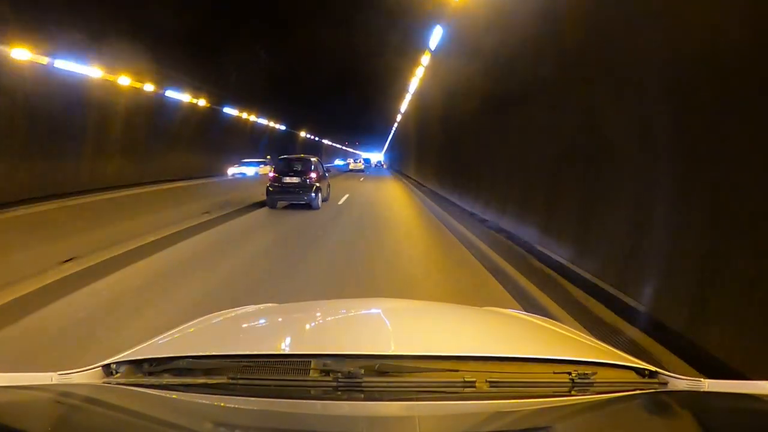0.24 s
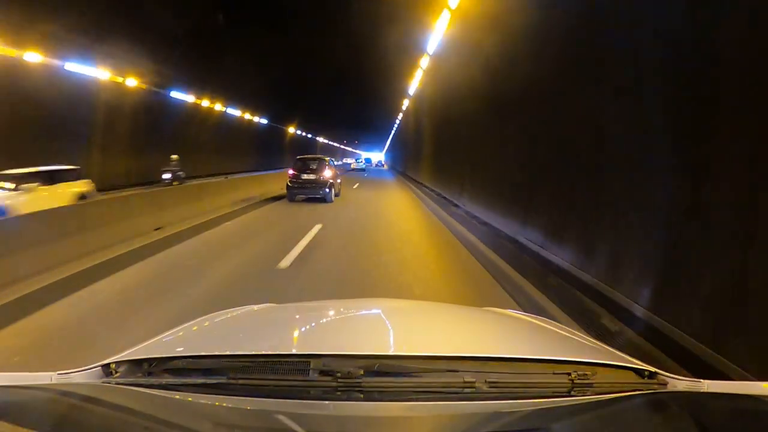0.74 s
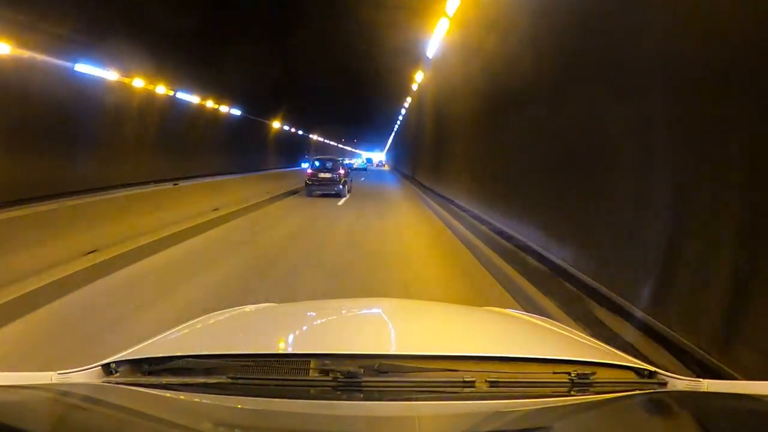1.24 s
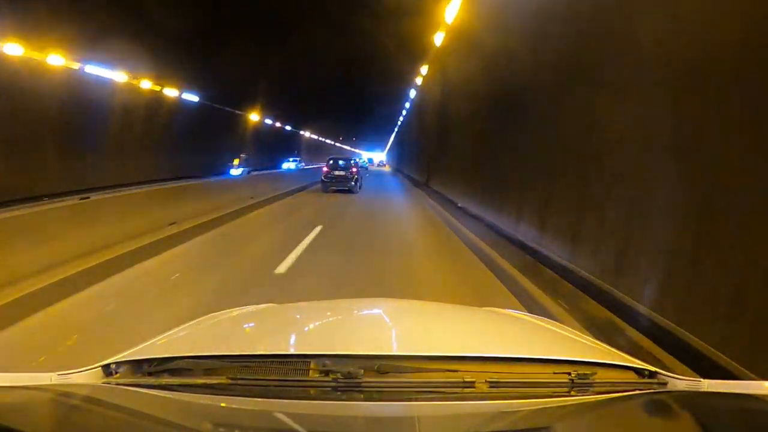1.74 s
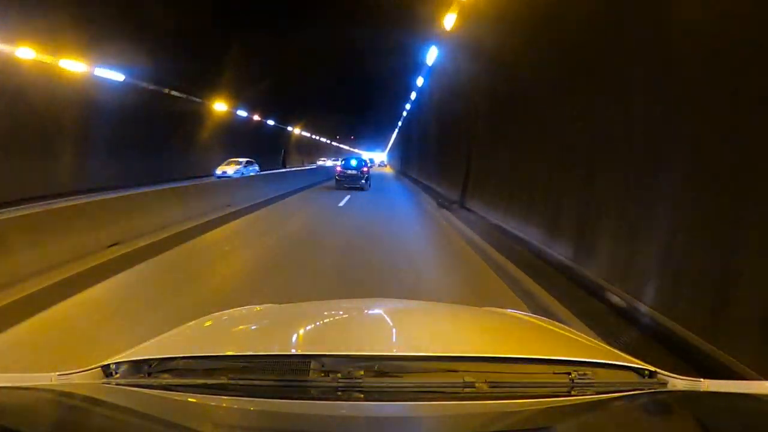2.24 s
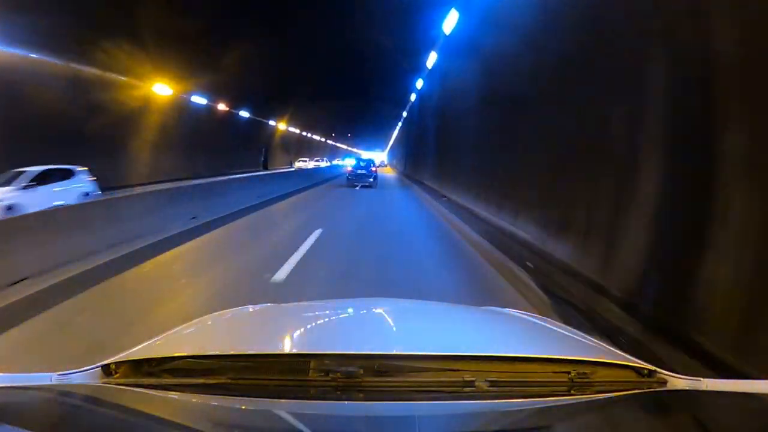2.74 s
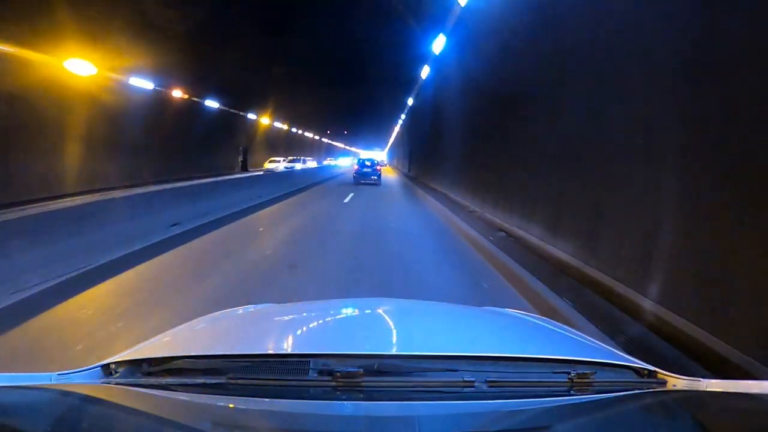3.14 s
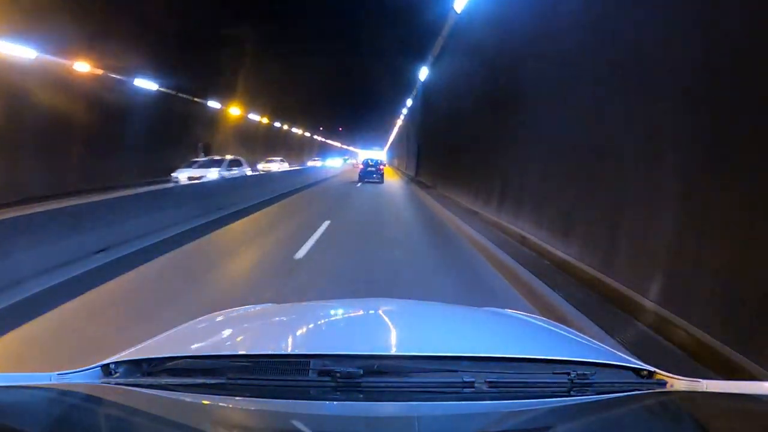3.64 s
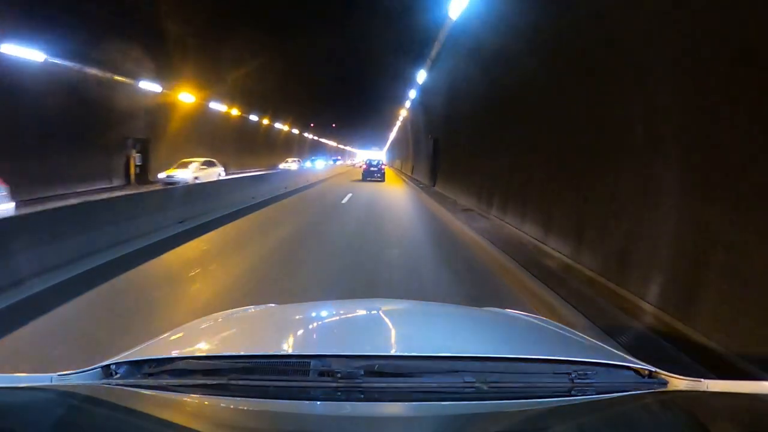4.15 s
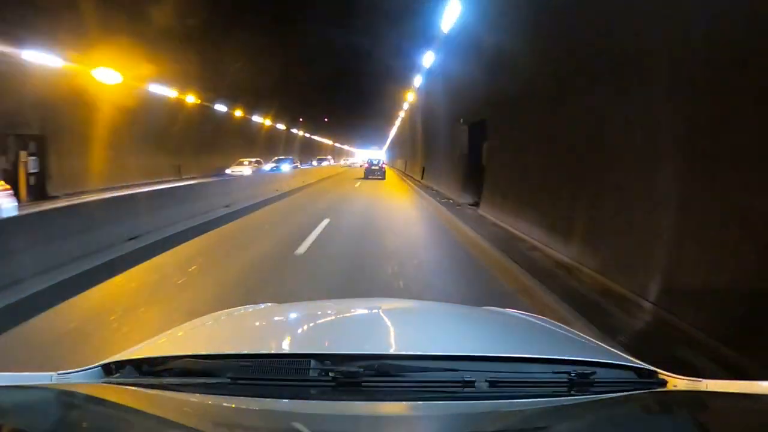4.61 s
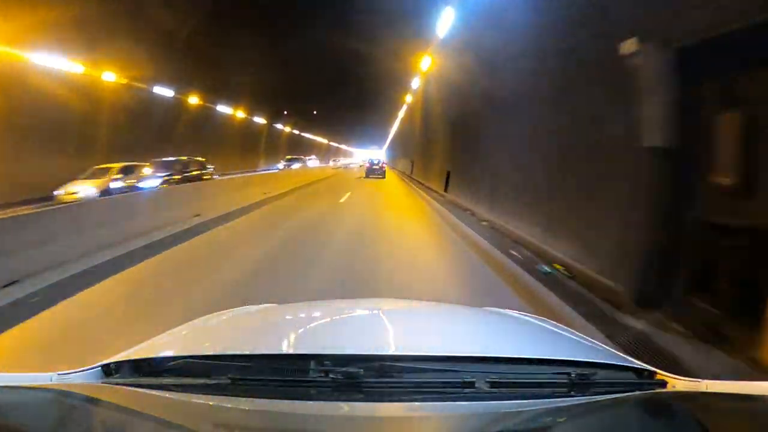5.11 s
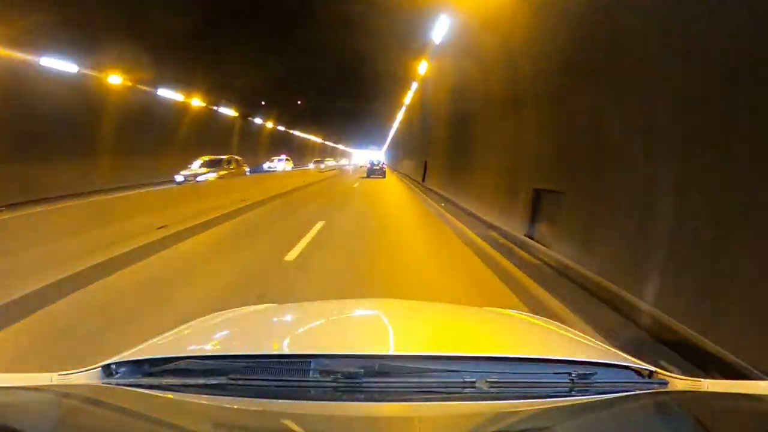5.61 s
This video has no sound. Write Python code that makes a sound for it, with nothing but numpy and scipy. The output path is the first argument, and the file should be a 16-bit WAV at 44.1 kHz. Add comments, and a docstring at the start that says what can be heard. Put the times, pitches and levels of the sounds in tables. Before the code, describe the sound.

From just behind the bonnet of a moving car, a deep, booming rumble dominates, surging irregularly with each bump in the road. Around it, continuous tyre noise washes through a concrete tunnel, rising and falling slightly as oncoming cars go by. Low wind buffets come harder in the second half, while light air hiss and occasional very faint trim rattles sit on top.

```python
"""Deep body rumble of a car cruising through a long road tunnel, heard from just behind the bonnet.
The uneven road shakes the panels; eddies off the bonnet buffet them. Tyre roar rings in the bore
and swells as oncoming cars pass behind the barrier. Air hisses over the windscreen and loose trim
chatters faintly."""
import sys
import numpy as np
from scipy import signal
from scipy.fft import rfft, irfft, next_fast_len
from scipy.io import wavfile
from scipy.ndimage import uniform_filter1d, minimum_filter1d, map_coordinates

SR = 44100
rng = np.random.default_rng(int(sys.argv[2]) if len(sys.argv) > 2 else 0)


def master_out(mix):
    """Clip the mix to full scale and print it as 16-bit PCM to the path in sys.argv[1]."""
    frames = np.transpose(np.atleast_2d(mix))
    ceiling = np.clip(frames, -1, 1)
    pcm = np.round(ceiling * 32767).astype(np.int16)
    wavfile.write(sys.argv[1], SR, pcm)


N = 258867
TIME_S = np.arange(N) / SR


def amp(db):
    """Decibels to gain."""
    return 10 ** (np.asarray(db) / 20)


def unit_rms(x):
    """x at rms 1."""
    return x / np.sqrt(np.mean(x ** 2) + 1e-20)


def over_freq(rows, hz):
    """(f/Hz, value) rows interpolated on a log axis."""
    knots_hz, values = np.transpose(rows)
    return np.interp(np.log(hz + 1), np.log(knots_hz + 1), values)


def over_time(rows):
    """(t/s, value) rows interpolated per sample."""
    return np.interp(TIME_S, *np.transpose(rows))


def wobble(rate_hz):
    """Smooth random curve, rate_hz knots a second."""
    knots = rng.standard_normal(int(N * rate_hz / SR) + 4)
    return map_coordinates(knots, [TIME_S * rate_hz])


def filtered(x, response):
    """Zero-phase filter with gain response(hz)."""
    size = next_fast_len(N + SR // 2)
    return irfft(rfft(x, size) * response(np.fft.rfftfreq(size, 1 / SR)), size)[:N]


def resonant(x, peaks):
    """Bell filters from (f/Hz, width/Hz, gain/dB) rows."""
    def response(hz):
        return amp(sum(db / (1 + (2 * (hz - peak_hz) / width_hz) ** 2) for peak_hz, width_hz, db in peaks))
    return filtered(x, response)


def noise(spectrum, patchy_db):
    """Coloured noise, rms 1, with drifting patches of random gain."""
    bins = signal.stft(rng.standard_normal(N), nperseg=1024)[2]
    patches = uniform_filter1d(rng.standard_normal(bins.shape), size=8, axis=0)
    patches = uniform_filter1d(patches, size=12, axis=1)
    patched = signal.istft(bins * amp(patchy_db * unit_rms(patches)), nperseg=1024)[1][:N]
    return unit_rms(filtered(patched, lambda hz: amp(over_freq(spectrum, hz))))


def steady(x, span_s):
    """Power held at 1 over span_s; faster flutter stays."""
    window = np.hanning(int(span_s * SR))
    energy = np.abs(signal.fftconvolve(x ** 2, window, 'same'))
    weight = signal.fftconvolve(np.ones(N), window, 'same')
    return x / np.sqrt(energy / weight + 1e-12)


# trim bursts: t/s, half-width/s, level/dB
TRIM_BURSTS = [(.24, .008, -75), (.61, .01, -78), (2.885, .008, -73.5), (3.425, .008, -76),
               (3.92, .008, -79), (4.39, .03, -73), (4.688, .03, -72), (4.895, .008, -76),
               (5.73, .025, -73)]
# trim buzz: f/Hz, density/dB
TRIM_SPECTRUM = [(2000, -29), (6000, -0.5), (10000, -3), (15000, -13.5)]
def trim_rattle(chatter_db):
    """Loose trim, shaken by the road, chatters in brief uneven contacts."""
    bursts = sum(amp(db) * np.exp(-((TIME_S - at_s) / half_s) ** 2) for at_s, half_s, db in TRIM_BURSTS)
    contacts = unit_rms(amp(chatter_db * wobble(rate_hz=250)))
    return bursts * contacts * noise(TRIM_SPECTRUM, patchy_db=-1.5)


# air over the glass: f/Hz, density/dB
HISS_SPECTRUM = [(400, -11.5), (1500, 3.5), (2400, 3.5), (3400, 0), (4300, -5), (5200, -10), (6300, -15),
                 (8000, -25), (10000, -37), (12500, -49), (15500, -61.5)]
# hiss envelope: t/s, level/dB
HISS_LEVEL = [(0.1, -46), (0.87, -45.3), (1.15, -46.8), (1.5, -45.5), (2.0, -44), (2.78, -43), (3.2, -45.5),
              (3.7, -46), (4.1, -45.8), (4.8, -48.5), (5.18, -50), (5.5, -49), (5.8, -48)]
# top treble of the hiss: t/s, gain/dB
FIZZ_GAIN = [(0.6, -2.5), (1.35, 4.5), (2.8, -1.5), (3.3, -5), (4.3, -3), (5.5, -0.5)]
def windscreen_hiss(gain_db, fizz_hz):
    """Small eddies hiss on the glass; the top treble comes and goes on its own."""
    hiss = noise(HISS_SPECTRUM, patchy_db=0.4)
    fizz = filtered(hiss, lambda hz: hz ** 4 / (hz ** 4 + fizz_hz ** 4))
    shelved = hiss + (amp(over_time(FIZZ_GAIN)) - 1) * fizz
    return amp(over_time(HISS_LEVEL) + gain_db) * shelved


# concrete bore decay: f/Hz, T60/s
BORE_T60 = [(100, 3.5), (1000, 2.1), (4000, 0.99), (12000, 0.93)]
def tunnel_wash(x):
    """The bore prolongs the sound; treble dies first."""
    hz, t_s, bins = signal.stft(rng.standard_normal(2 * SR), SR, nperseg=256)
    decay = amp(-60 * t_s / over_freq(BORE_T60, hz)[:, None])
    tail = signal.istft(bins * decay, SR, nperseg=256)[1]
    return signal.fftconvolve(x, tail / np.linalg.norm(tail))[:N]


# cars abreast: t/s, roar level/dB, rasp re roar/dB
PASSES = [(0.0, -32, -9.5), (.45, -35.5, -17.5), (.95, -36, -10.5), (1.75, -36.5, -8.5),
          (2.101, -34.5, -14), (2.63, -32, -6.5), (2.92, -33, -12), (4.07, -33.3, -8.5),
          (4.31, -35.5, -4.5), (5.6, -40, -2.5)]
# their tyres over the barrier: f/Hz, density/dB
ROAR_SPECTRUM = [(80, -28), (300, -9), (450, -4.5), (620, -0.5), (850, -0.5), (1150, -2.5), (1400, -6.5),
                 (2500, -21), (5000, -47.5), (12000, -120)]
# their tread close by: f/Hz, density/dB
RASP_SPECTRUM = [(500, -26), (1000, -6), (1450, 2.5), (2200, -6.5), (3200, -13), (5000, -35.5),
                 (10000, -88)]
def oncoming_cars(closing_m_per_s, lane_gap_m):
    """Tyre roar falls as 1/distance; tread rasp, as 1/distance squared, carries only from near."""
    roar_power = rasp_power = 0
    for abreast_s, roar_db, rasp_db in PASSES:
        inverse_square = 1 / (1 + (closing_m_per_s * (TIME_S - abreast_s) / lane_gap_m) ** 2)
        roar_power += amp(roar_db) ** 2 * inverse_square
        rasp_power += (amp(roar_db + rasp_db) * inverse_square) ** 2
    roar = np.sqrt(roar_power) * noise(ROAR_SPECTRUM, patchy_db=0.33)
    rasp = np.sqrt(rasp_power) * noise(RASP_SPECTRUM, patchy_db=0.6)
    return roar + rasp


# tyres on asphalt: f/Hz, density/dB
TYRE_SPECTRUM = [(100, -23.5), (300, 0.5), (500, -4.5), (750, -2.5), (1030, -0.5), (1300, -3), (1900, -7.5),
                 (2600, -16), (3600, -26), (5500, -49.5), (12000, -120)]
# rolling envelope: t/s, level/dB
TYRE_LEVEL = [(0.0, -32.5), (1.4, -32), (3.8, -31.9), (4.6, -31.5), (5.1, -33), (5.8, -31.5)]
def own_tyres():
    """Rolling noise at cruising speed drifts only with the asphalt."""
    return amp(over_time(TYRE_LEVEL)) * noise(TYRE_SPECTRUM, patchy_db=0.5)


# tread resonance: f/Hz, width/Hz, gain/dB
TREAD_PEAK = [(1060, 470, 0.5)]
def tread_song(x):
    """The tread sings: a slight lift near 1 kHz."""
    return resonant(x, TREAD_PEAK)


# bonnet eddies: f/Hz, density/dB
EDDY_SPECTRUM = [(2, -9), (10, -5.5), (22, 4), (45, 4.5), (62, -6.5), (100, -23), (800, -140)]
# gusts: t/s, gain/dB
GUST_PEAKS = [(.9, 2.5), (2.43, 7), (2.92, 4), (3.26, 9), (3.6, 4.5), (4.17, 0.5), (4.42, 4), (4.71, 6),
              (4.96, 7), (5.72, 4.5)]
def wind_buffet(level_db, flutter_db, gust_half_s):
    """Large eddies roll off the bonnet and press on the car, harder in gusts."""
    gust_db = sum(db * np.exp(-((TIME_S - at_s) / gust_half_s) ** 2) for at_s, db in GUST_PEAKS)
    envelope = amp(level_db + gust_db + flutter_db * wobble(rate_hz=6))
    return envelope * steady(noise(EDDY_SPECTRUM, patchy_db=1.0), span_s=0.3)


def road_shake(bumps, floor_db=-18, rise_s=0.0057, settle_s=0.07):
    """Envelope over an even floor: the tyre climbs each bump, crosses it, and the suspension settles."""
    power = amp(floor_db) ** 2
    for at_s, length_s, db in bumps:
        before_s = np.maximum(at_s - TIME_S, 0)
        after_s = np.maximum(TIME_S - at_s - length_s, 0)
        power = power + (amp(db) * np.exp(-before_s / rise_s - after_s / settle_s)) ** 2
    return np.sqrt(power)


# road force on the body: f/Hz, density/dB
ROAD_SPECTRUM = [(25, -31), (45, -2.5), (62, 0), (88, 0), (125, -3), (170, -10), (220, -13.5), (260, -17),
                 (310, -20.5), (380, -25), (900, -39.5), (3000, -130)]
# panel resonances: f/Hz, width/Hz, gain/dB
PANEL_MODES = [(61, 3.6, 1.5), (93, 4.5, -0.5), (123, 21, 0), (213, 52, 3), (305, 12, 2)]
# uneven patches: t/s, length/s, boom level/dB, drone re boom/dB
ROAD_BUMPS = [(0.0, 0.081, -16.5, -4), (0.296, 0.076, -19.5, 3), (0.466, 0.05, -15.5, -2),
              (0.793, 0.068, -19, 2), (0.924, 0.06, -13, -2.5), (1.166, 0.048, -17, -1),
              (1.425, 0.16, -22.5, 2), (2.017, 0.09, -15, -2.5), (2.383, 0.051, -27.5, 9),
              (2.812, 0.078, -16, 4), (3.006, 0.17, -15.5, -2), (3.32, 0.11, -14.5, -7),
              (4.068, 0.089, -15, -9), (4.374, 0.34, -17.5, -3.5), (4.993, 0.088, -17, -13),
              (5.238, 0.05, -18.5, 1.5), (5.479, 0.14, -15, 0.5), (5.723, 0.11, -18.5, -5)]
def body_rumble(gain_db, crossover_hz):
    """Road grain drives the panels; bumps swell the deep boom, sharp ones the drone above it."""
    road = noise(ROAD_SPECTRUM, patchy_db=0.5)
    body = steady(resonant(road, PANEL_MODES), span_s=0.18)
    boom = filtered(body, lambda hz: 1 / (1 + (hz / crossover_hz) ** 6))
    drone = body - boom
    boom_gain = road_shake([(at_s, length_s, db) for at_s, length_s, db, _ in ROAD_BUMPS])
    drone_gain = road_shake([(at_s, length_s, db + rel_db) for at_s, length_s, db, rel_db in ROAD_BUMPS])
    return amp(gain_db) * (boom_gain * boom + drone_gain * drone)


def scene():
    """Mono mix; only the tyre noise feeds the bore."""
    rumble = body_rumble(gain_db=-2.0, crossover_hz=160)
    buffet = wind_buffet(level_db=-23.0, flutter_db=1.5, gust_half_s=0.084)
    traffic = tread_song(own_tyres() + oncoming_cars(closing_m_per_s=41.0, lane_gap_m=8.26))
    wash = amp(-16.0) * tunnel_wash(traffic)
    hiss = windscreen_hiss(gain_db=2.0, fizz_hz=8100)
    rattle = trim_rattle(chatter_db=8)
    return (rumble + buffet + traffic + wash + hiss + rattle)[None]


def record(dry, ceiling_db=-5.5, hold_s=0.016, cutoff_hz=15700):
    """Limiter on the tallest rumble peaks, then a steep low-pass."""
    x = dry[0]
    hold_samples = int(hold_s * SR)
    needed_gain = np.minimum(1, amp(ceiling_db) / (np.abs(x) + 1e-9))
    gain = uniform_filter1d(minimum_filter1d(needed_gain, 2 * hold_samples), hold_samples)
    return filtered(x * gain, lambda hz: 1 / (1 + (hz / cutoff_hz) ** 60))[None]


dry = scene()
out = record(dry)
master_out(out)
```